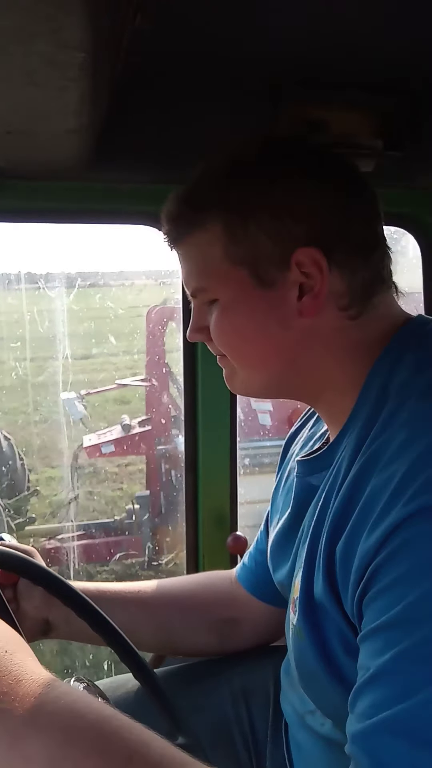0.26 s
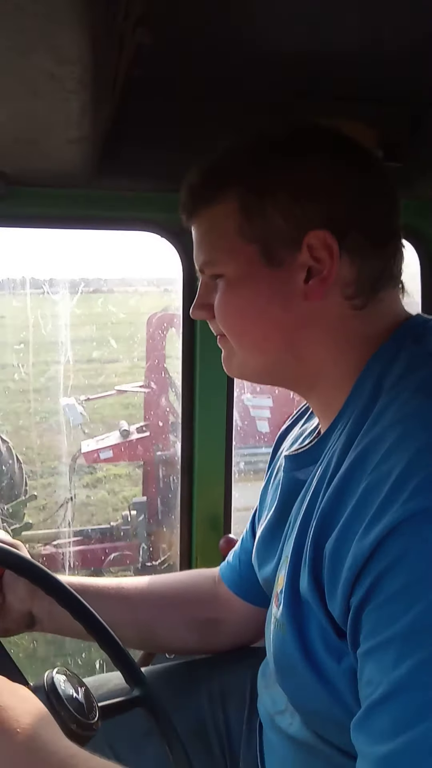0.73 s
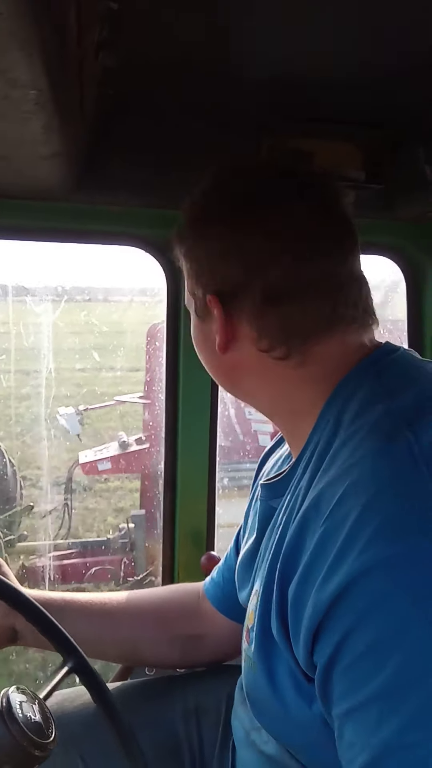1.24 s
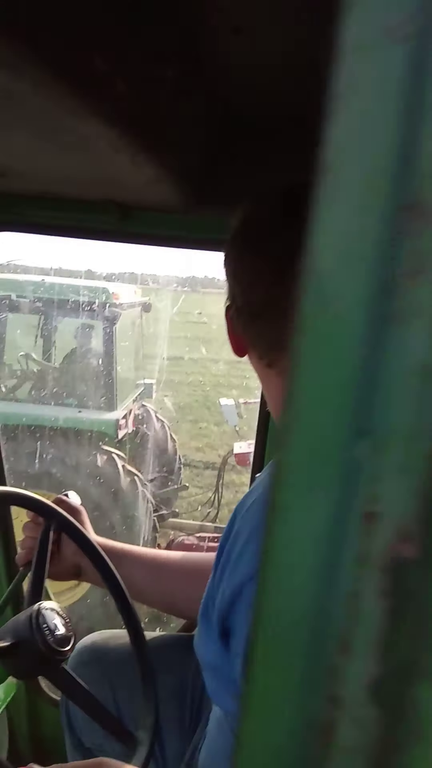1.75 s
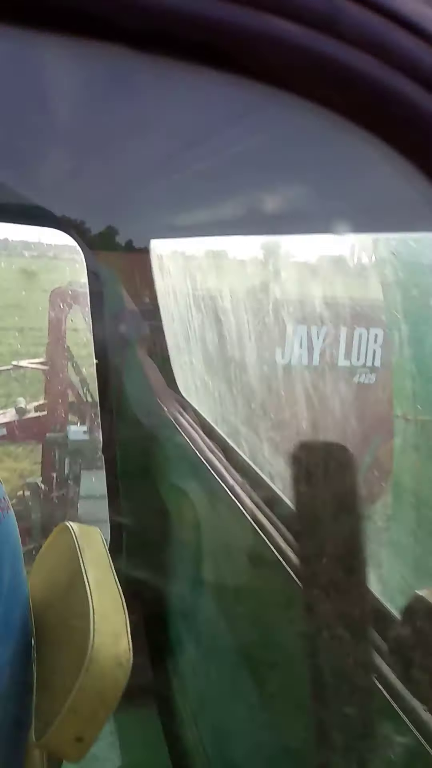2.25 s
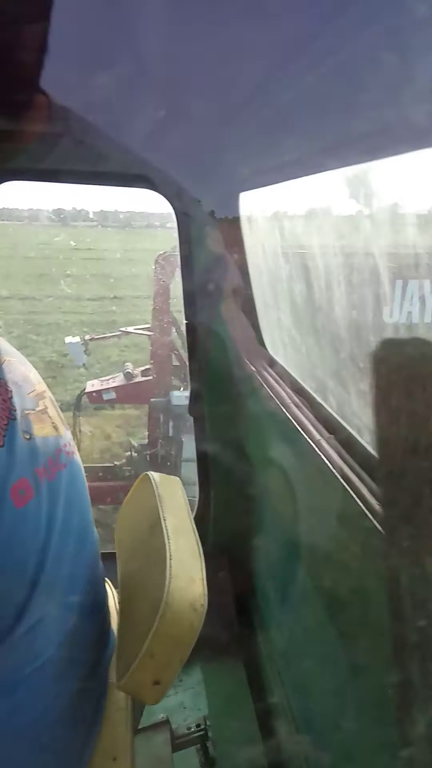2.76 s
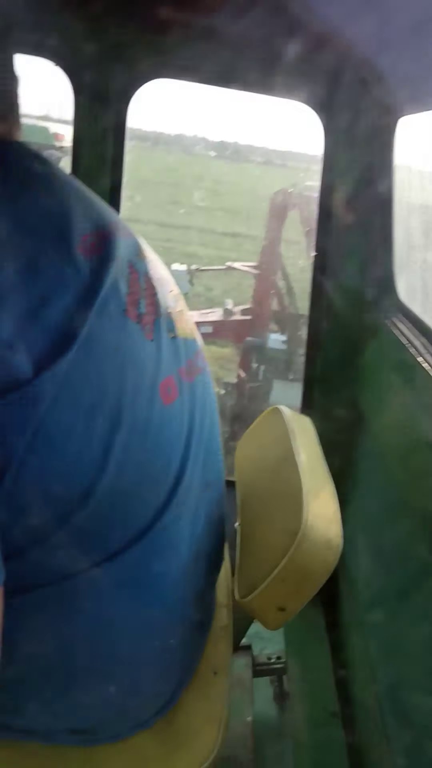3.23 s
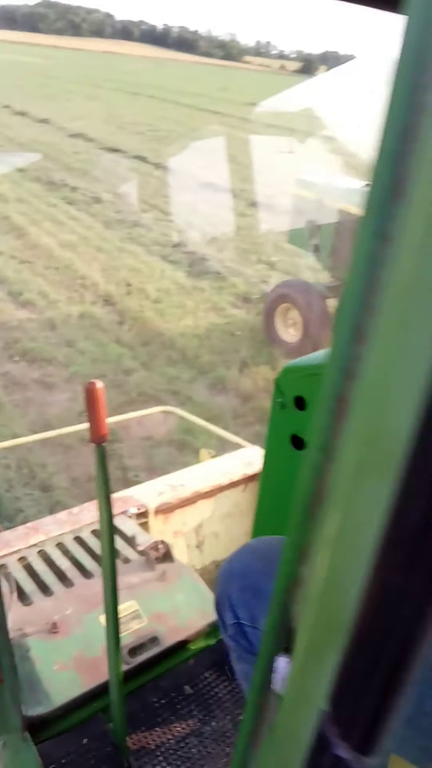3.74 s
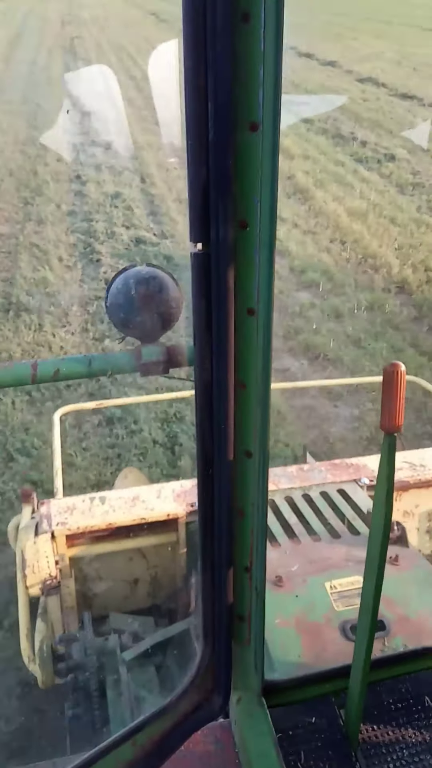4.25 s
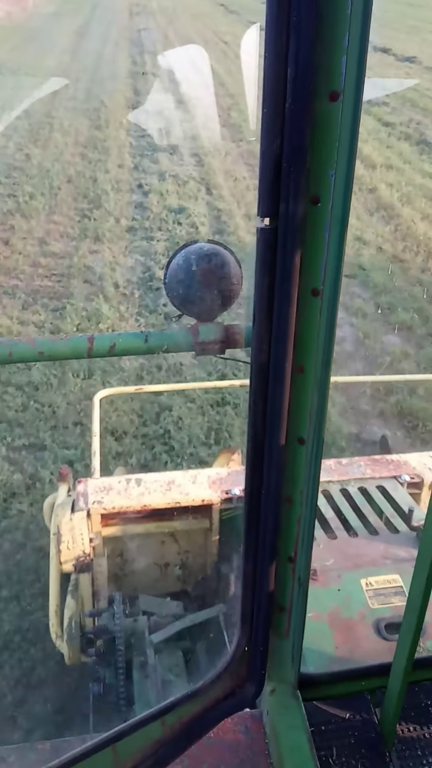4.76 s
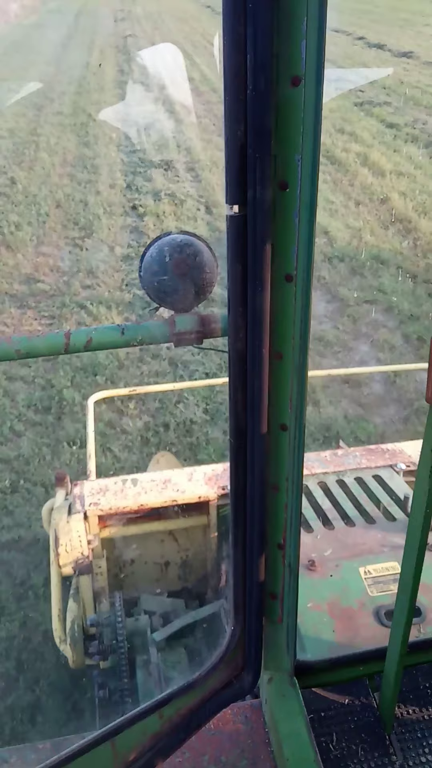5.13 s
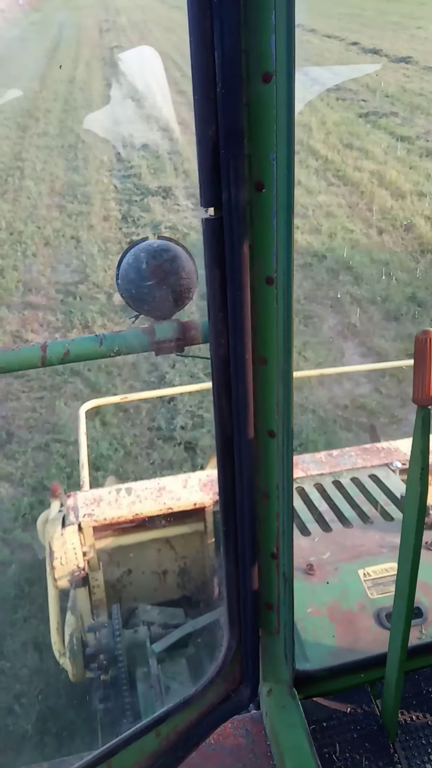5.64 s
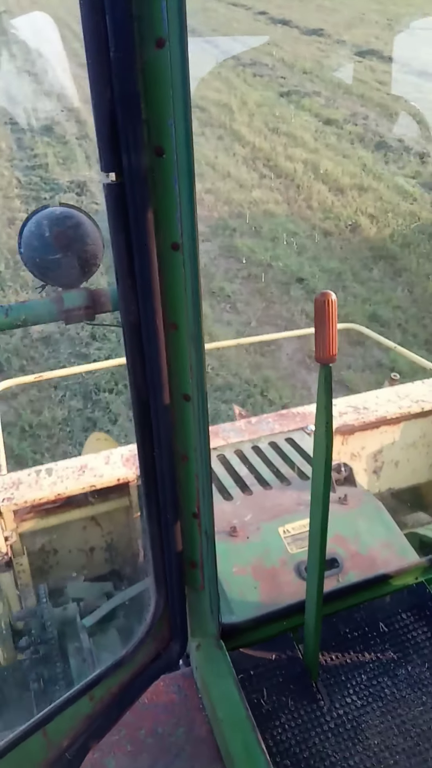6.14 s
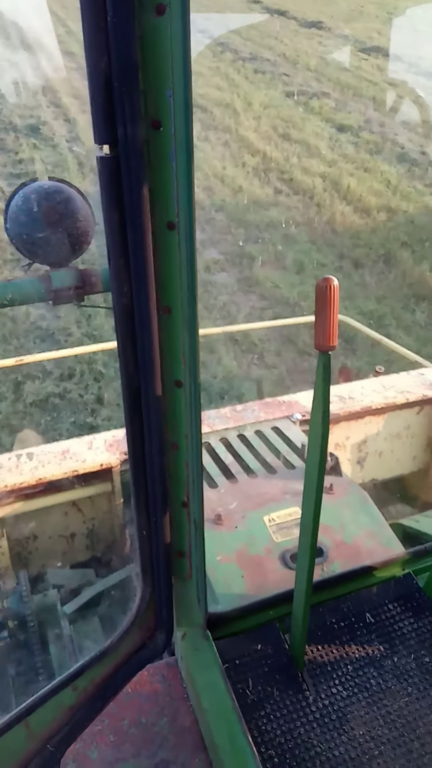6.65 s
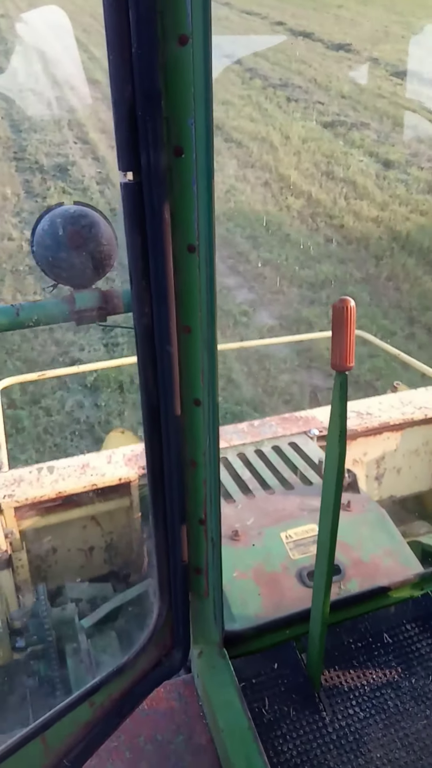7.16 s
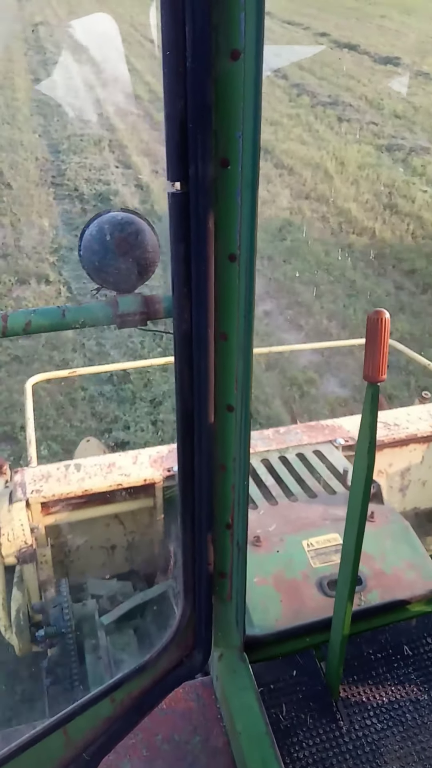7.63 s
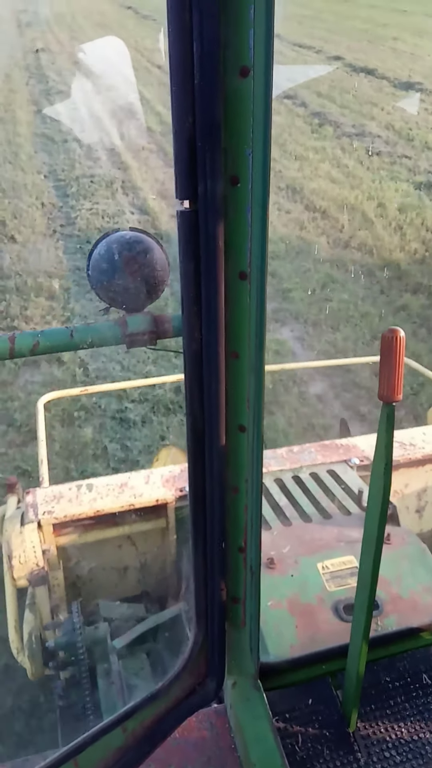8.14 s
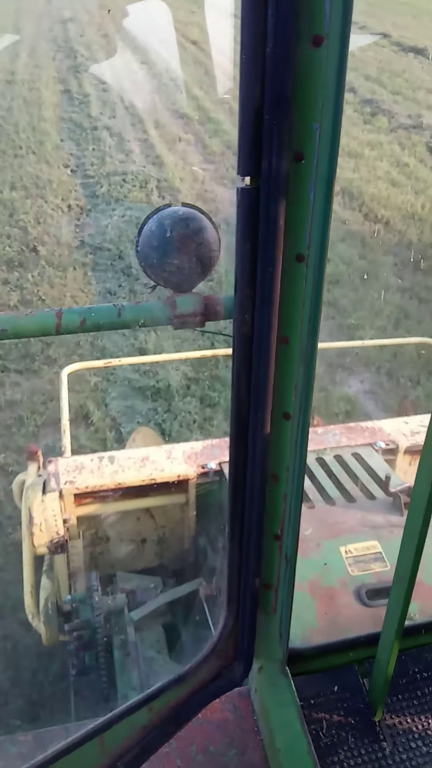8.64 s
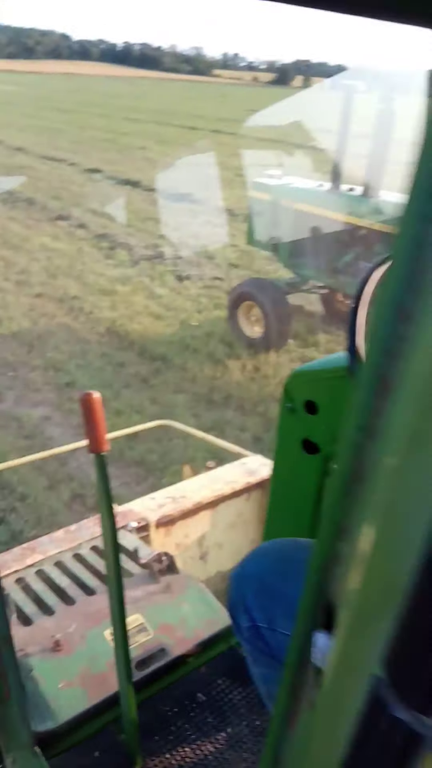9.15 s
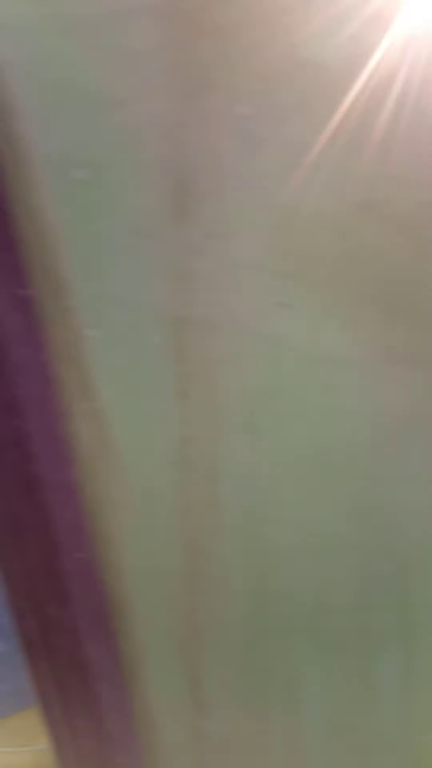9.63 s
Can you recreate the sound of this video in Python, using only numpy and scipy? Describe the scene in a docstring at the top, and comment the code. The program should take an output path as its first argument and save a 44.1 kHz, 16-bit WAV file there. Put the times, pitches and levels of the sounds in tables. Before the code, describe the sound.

A heavy diesel drones steadily from beginning to end inside a harvester cab, beating against blower and shaft hums over a wide, rumbling panel roar. Chains tick within the hiss of blown grass. From 0 to 1.4 seconds the microphone faces the driver; knives buzz under load and squeal strongly around 1 second. Around 1.7 loose parts rattle, and from 2 to 3.5 the bass hum grows fuller, with a lighter cut near 2.5 and a short knock at 3.3. Facing the windscreen from 4, header clatter is more exposed; a scraping, whining burst comes at 4.1 to 4.6, then steadier droning until another at 6.5. Heavier bursts shred and squeal at 7.4, 8.3 and 8.8 to 9.1, each sagging the pitch slightly. After 9.2 the microphone swings back, the deep hum swells, and the noise is cut off at about 9.9.

```python
"""Inside the cab of a self-propelled forage harvester working a row of grass.
A six-cylinder diesel drones in wavering firing lines; blower and shaft hums, geared to it, beat against it.
Wads of grass load the knives, which buzz, shred and squeal, and drag the speed of the whole machine down.
Shaped noise makes the cab's roar, the hiss of blown grass, the header's clatter and the rattle of loose parts.
The bass and the roar's colour change as the microphone moves about and turns from driver to windscreen."""
import sys
import numpy as np
from scipy import signal
from scipy.fft import rfft, irfft
from scipy.io import wavfile
from scipy.ndimage import uniform_filter1d, minimum_filter1d

SR = 44100
rng = np.random.default_rng(int(sys.argv[2]) if len(sys.argv) > 2 else 0)


def digitize_waveform(pressure):
    """Quantize a signal to 16-bit integers and store it at the path in sys.argv[1].

    Rows of a 2-D input are taken as channels; values are limited to [-1, 1].
    """
    field = np.atleast_2d(pressure).T
    bounded = np.clip(field, -1, 1)
    quanta = np.round(bounded * 32767).astype(np.int16)
    wavfile.write(sys.argv[1], SR, quanta)


N = 436149
T = np.arange(N) / SR
HZ = np.fft.rfftfreq(N, 1 / SR)
FREE_HZ = 134.7  # knife strokes a second when running free
SIDES = np.array([[.5], [-.5]])  # left and right port, as halves of a difference


def amp(db):
    """Decibels to gain."""
    return 10 ** (np.asarray(db) / 20)


def unit(x):
    """Scales to an rms of one."""
    return x / np.sqrt(np.mean(x ** 2) + 1e-20)


def follow(rows):
    """The columns of a curve, sample by sample; the first column is the time in seconds."""
    s, *columns = np.transpose(rows)
    return [np.interp(T, s, c) for c in columns]


def read(points, hz):
    """A spectrum's value on a log-frequency axis."""
    f, value = np.transpose(points)
    return np.interp(np.log(hz + 1), np.log(f + 1), value)


def drift(rate_hz):
    """Slow random wandering with an rms of one: noise low-passed at the given rate."""
    grid = np.arange(0, T[-1] + 1, 1 / 400)
    f = np.fft.rfftfreq(len(grid), grid[1])
    spectrum = rfft(rng.standard_normal(len(grid))) / (1 + (f / rate_hz) ** 4)
    return np.interp(T, grid, unit(irfft(spectrum, len(grid))))


def swell(s, length):
    """A bell-shaped passage: it thickens and thins again."""
    return np.exp(-((T - s) / length) ** 2)


def waver(turns, rough, rate_hz):
    """A line whose strength and phase waver."""
    angle = 2 * np.pi * turns
    in_phase = (1 + rough * drift(rate_hz)) * np.cos(angle)
    across = rough * drift(rate_hz) * np.sin(angle)
    return np.sqrt(2 / (1 + 2 * rough ** 2)) * (in_phase + across)


def tone(turns, rough, rate_hz):
    """A wavering line that starts anywhere in its cycle."""
    return waver(turns + rng.random(), rough, rate_hz)


def colour(pair, spectrum):
    """Gives two unrelated signals a spectrum and the cab's left-right likeness."""
    # How alike the two ports sound. Each row: frequency in Hz, left-right likeness (1 is identical).
    likeness = [(25, 0.85), (60, 0.99), (120, 0.92), (190, 0.68), (300, 0.9), (450, 0.73), (750, 0.64),
                (1100, 0.42), (2200, 0.24), (15000, 0.073)]
    a, b = rfft(pair)
    same = np.clip(read(likeness, HZ), -1, 1)
    second = same * a + np.sqrt(1 - same ** 2) * b
    return unit(irfft(np.array([a, second]) * amp(read(spectrum, HZ)), N))


def cab_roar(cycles, roar_db, share, pulsing=0.14, throb=0.12, patchy_db=1.12):
    """Panels shaken by strong and weak firings, swelling in patches; the colour turns with the microphone."""
    # The roar's colour facing the windscreen. Each row: frequency in Hz, relative level in dB.
    roar_colour = [(20, -13.5), (42, -19), (75, -10), (105, -2.5), (145, 4), (200, 2), (300, -0.5),
                   (430, -0.5), (490, -7.5), (800, -3), (1200, -16), (2500, -21), (6000, -28), (15000, -82)]
    # What facing the driver adds to that colour. Each row: frequency in Hz, change in dB.
    driver_colour = [(40, 6), (200, 0.5), (330, 0.5), (440, 2.5), (540, 4.5), (790, -5.5), (1200, 8.5),
                     (2500, 1), (6000, 3.5)]
    firings = 6 * cycles
    pulse = 1 + pulsing * np.cos(2 * np.pi * firings) + throb * np.cos(np.pi * firings)
    shake = rng.standard_normal((2, N)) * pulse
    # patches of the time-frequency plane swell and fade, alike in both ports
    z = signal.stft(shake, nperseg=512)[2]
    patches = uniform_filter1d(rng.standard_normal(z.shape[1:]), size=5, axis=0)
    patches = unit(uniform_filter1d(patches, size=14, axis=1))
    shake = signal.istft(z * amp(patchy_db * patches), nperseg=512)[1][:, :N]
    front = colour(shake, roar_colour)
    beside = irfft(rfft(front) * amp(read(driver_colour, HZ)), N)
    return amp(roar_db) * (share * beside + (1 - share) * front)


def hollowed(roar, width_octaves=0.4):
    """The cab's standing waves lift or hollow three bands of the roar differently at each place."""
    # Each row: time in seconds, peak change of the low, the middle and the high band in dB.
    hollows = [(0, -3, 0, -1.5), (1.2, -7.5, -0.5, -2), (1.75, 1, 0, -0.5), (2.3, 1.5, -4, -0.5),
               (3.3, 2, -2.5, -0.5), (4.1, 0.5, -1.5, -1), (5.3, -2, 0.5, 2), (6.8, 1, -0.5, 0.5),
               (7.7, 0.5, 0.5, 0), (9.1, 0.5, 0.5, -1.5), (9.89, -2, 0, 2.5)]
    spectrum, octave = rfft(roar), np.log2(HZ + 1)
    out = roar.copy()
    for hz, db in zip([283, 430, 900], follow(hollows)):
        bell = np.exp(-((octave - np.log2(hz)) / width_octaves) ** 2)
        out += (amp(db) - 1) * irfft(spectrum * bell, N)
    return out


def chains(clicks_per_s=260, clatter=0.32, level_db=-35, flutter_db=1.5):
    """Chain links tick in the hiss of blown grass: random clicks swell a fluttering noise."""
    # The hiss's colour. Each row: frequency in Hz, relative level in dB.
    hiss_colour = [(900, -23), (2200, 2.5), (3200, -1), (4400, -2), (5500, 2.5), (6600, -1.5), (7600, -11),
                   (8100, -37), (8700, -19.5), (11500, -23), (13800, -32.5), (15000, -22.5)]
    sizes = amp(4 * np.minimum(rng.exponential(1, N), 3))
    clicks = (rng.random(N) < clicks_per_s / SR) * sizes
    rattle = unit(signal.lfilter([1], [1, -np.exp(-1 / (0.0017 * SR))], clicks))  # 1.7 ms decay
    strength = np.sqrt(1 + (clatter * rattle) ** 2) * amp(flutter_db * drift(22))
    return amp(level_db) * colour(strength * rng.standard_normal((2, N)), hiss_colour)


def header(share, level_db=-33, swell_db=-2.0, clicks_per_s=120):
    """Tines and auger of the pickup header knock irregularly, loudest when the microphone faces them."""
    # The clatter's colour through the windscreen. Each row: frequency in Hz, relative level in dB.
    clatter_colour = [(200, -13), (330, -1), (520, 1), (800, -3.5), (1200, 9), (2000, 6.5), (2900, 0.5),
                      (3600, -41), (5500, 1.5), (8000, -62)]
    knocks = (rng.random(N) < clicks_per_s / SR) * rng.uniform(.3, 1, N)
    strength = 0.5 + unit(signal.lfilter([1], [1, -np.exp(-1 / (0.0089 * SR))], knocks))  # 8.9 ms decay
    exposure = 1 - 0.84 * share
    clatter = colour(strength * rng.standard_normal((2, N)), clatter_colour)
    return exposure * amp(level_db + swell_db * drift(11)) * clatter


def fittings():
    """Loose parts of the cab chatter briefly: band-passed noise with a fast attack and a short decay."""
    # Each row: start in seconds, pitch in Hz, level in dB before the envelope, decay in seconds,
    # half bandwidth as a share of the pitch.
    knocks = [(0.445, 490, -20, 0.035, 0.19), (1.635, 536, -21, 0.023, 0.15), (1.69, 1240, -29, 0.06, 0.27),
              (1.75, 5400, -31, 0.04, 0.12), (2.067, 1840, -24, 0.015, 0.08),
              (2.64, 1520, -23.5, 0.023, 0.04), (2.783, 5500, -23, 0.0072, 0.073),
              (3.3, 940, -16, 0.014, 0.044), (4.06, 435, -14, 0.045, 0.25), (8.325, 1040, -22, 0.03, 0.08),
              (9.275, 1724, -30, 0.055, 0.06)]
    out, t = np.zeros((2, N)), T[:SR // 5]
    for s, hz, db, decay, width in knocks:
        band = signal.butter(2, [hz * (1 - width), hz * (1 + width)], "band", fs=SR, output="sos")
        chatter = unit(signal.sosfilt(band, rng.standard_normal((2, len(t)))))
        envelope = np.exp(-t / decay) * (1 - np.exp(-t / 0.0012))
        out[:, round(s * SR):][:, :len(t)] += amp(db) * chatter * envelope
    return out


def engine_block(cycles, level_db=-44, fall_db_per_octave=-2, uneven_db=4, change_hz=2.2):
    """The block rings on high multiples of half the firing rate; lines come and go among standing waves."""
    half_firings = 3 * cycles
    out = np.zeros(N)
    for k in range(11, 23):
        line_db = level_db + fall_db_per_octave * np.log2(k / 11) + uneven_db * np.tanh(drift(change_hz))
        out += amp(line_db) * np.sqrt(2) * np.cos(2 * np.pi * (k * half_firings + rng.random()))
    return out


def shafts(strokes, throb_db, level_db=-1.5):
    """Belt-driven shaft hums beat with the engine; their long waves change less from place to place."""
    # Turns of each shaft per knife stroke.
    shaft_ratios = [.4812, .6024, .9624, 1.181, 1.4436, 2.441]
    # Hum of each shaft, relative level in dB.
    shaft_db = [-15, -15.5, -8, -16, -9.5, -16.5]
    hums = sum(amp(db) * tone(ratio * strokes, rough=0.07, rate_hz=6.1)
               for ratio, db in zip(shaft_ratios, shaft_db))
    # only half of the throb's change from place to place
    return amp(level_db + (throb_db + throb_db.mean()) / 2) * hums


def blower(cycles, blower_db, overtone_db, share, upper_db=-39, node_turns=-0.1,
           beat_hz=2.385, beat_at_s=2.26):
    """Paddles pass just above the engine's second firing harmonic, so the drone beats slowly."""
    # the two tones are in step, and swell together, around beat_at_s
    passes = 12 * cycles + beat_hz * (T - beat_at_s)
    # upper lines show beside the driver
    upper = sum(tone(k * passes, rough=.3, rate_hz=4) for k in (3, 4))
    # by the windscreen a node of the blower tone puts the two ports out of step
    hum = waver(passes + node_turns * (1 - share) * SIDES, rough=0.091, rate_hz=2.8)
    overtone = tone(2 * passes, rough=0.32, rate_hz=5.5)
    return amp(blower_db) * hum + amp(overtone_db) * overtone + amp(upper_db) * share * upper


def diesel(cycles, firing_db, throb_db, share, second_db=-8.0, uneven_db=-6.5):
    """Six firings a cycle and their second harmonic; unequal cylinders fill in the other multiples."""
    # Lines beside the firing tone. Each row: multiple of the four-stroke cycle, relative level in dB,
    # change when facing the driver in dB.
    cycle_lines = [(1, -35, 0), (2, -21, -2.5), (3, -26.5, 7), (5, -11, -10.5), (7, -12, 6),
                   (8, -4.5, -5.5), (9, -2, 1), (10, 0.5, 1), (14, -25, -1), (15, -9, -1), (17, -16.5, 5.5),
                   (20, -13.5, -13), (26, -10.5, -2), (34, -13, -9)]
    firings = 6 * cycles
    firing = tone(firings, rough=0.081, rate_hz=6.7)
    firing = firing + amp(second_db) * waver(2 * firings, rough=0.035, rate_hz=2.6)
    uneven = sum(amp(db + driver_db * share) * tone(k * cycles, rough=0.033, rate_hz=2.4)
                 for k, db, driver_db in cycle_lines)
    return amp(firing_db) * firing + amp(throb_db + uneven_db) * uneven


def feed(patchy_db=2, thin_crop_db=-37, flywheel_s=0.219):
    """Wads ride on the thin crop and drag the flywheel down: the cutting load, and the sag in Hz."""
    # Wads reaching the knives. Each row: middle in seconds, half length in seconds, cutting load in dB,
    # drag on the knife strokes in Hz before the flywheel's lag.
    wads = [(0.04, 0.061, -25, 1.36), (0.539, 0.37, -32.5, 0.4), (1.001, 0.21, -26.5, 2.32),
            (1.248, 0.14, -25, 0.4), (2.098, 0.22, -33, 1.2), (2.503, 0.15, -27.5, 0.33),
            (3.119, 0.35, -42, 0.71), (4.175, 0.17, -26, 1.5), (4.385, 0.13, -26, 2.12),
            (6.455, 0.21, -28.5, 1.05), (6.556, 0.025, -28, 0.29), (7.425, 0.18, -25, 3),
            (7.94, 0.13, -36, 0.43), (8.287, 0.097, -25, 1.22), (8.351, 0.38, -28.5, 1.66),
            (8.823, 0.13, -24, 2.28), (9.027, 0.099, -28.5, 1.36)]
    power = amp(thin_crop_db + patchy_db * drift(1.66)) ** 2
    power = power + sum((amp(db) * swell(s, length)) ** 2 for s, length, db, _ in wads)
    drag_hz = sum(hz * swell(s, length) for s, length, _, hz in wads)
    keep = np.exp(-1 / (flywheel_s * SR))
    sag_hz = signal.lfilter([1 - keep], [1, -keep], drag_hz, zi=[drag_hz[0]])[0]
    return np.sqrt(power), sag_hz


def judder(strokes, load, depth_hz=0.298, rate_hz=9):
    """Uneven crop jerks the cutterhead against its belt, the more the heavier the load."""
    return strokes + np.cumsum(depth_hz * load / load.max() * drift(rate_hz)) / SR


def housing(strokes, load, hum_db=-2.0, steepness=0.27, spread=0.48, flicker_db=3.5, wander=0.2):
    """The steel housing hums on the 4th knife harmonic under load, and whines at times on the 10th."""
    # Whines around the wads. Each row: middle in seconds, half length in seconds, level in dB before flicker.
    whine_swells = [(0.05, 0.15, -35.5), (1.0, 0.21, -37.5), (1.26, 0.19, -34), (2.45, 1, -39),
                    (4.31, 0.17, -34), (4.554, 0.097, -26.5), (6.475, 0.33, -34), (7.54, 0.16, -30),
                    (8.01, 0.14, -31), (8.32, 0.12, -29), (8.7, 0.39, -34), (9.053, 0.1, -30.5)]
    ringing = np.sqrt(sum((amp(db) * swell(s, length)) ** 2 for s, length, db in whine_swells))
    # a standing wave puts the two ports out of step
    angle = 2 * np.pi * (10 * strokes + spread * SIDES) + wander * drift(8)
    whine = np.sqrt(2) * ringing * amp(flicker_db * np.tanh(drift(21))) * np.cos(angle)
    hum = tone(4 * strokes, rough=.2, rate_hz=5)
    return whine + amp(hum_db) * load * (load / load.max()) ** steepness * hum


def squeals(strokes, level_db=-1, flicker_db=1.5, flicker_hz=36, pulsing=0.25, scrape_hz=260,
            rough_per_multiple=0.0033, settle_s=0.01):
    """Single knife harmonics squeal, pulsing with the strokes; high and short ones smear into a scrape."""
    # Squeals of hard wads. Each row: middle in seconds, half length in seconds, multiple of the knife
    # stroke, level in dB before the common trim and flicker.
    squeal_bursts = [(0.77, 0.15, 11, -30), (0.92, 0.08, 28, -34), (0.92, 0.11, 39, -39),
                     (0.998, 0.14, 40, -36), (1.04, 0.16, 29, -33), (1.04, 0.12, 41, -32),
                     (1.05, 0.2, 36, -36), (1.093, 0.09, 4, -17.5), (1.19, 0.28, 14, -30.5),
                     (1.217, 0.27, 11, -24), (1.22, 0.15, 23, -36), (1.17, 0.2, 33, -39.5),
                     (2.14, 0.2, 17, -34), (2.48, 0.13, 20, -31), (2.563, 0.12, 21, -39),
                     (2.56, 0.09, 31, -41), (4.12, 0.11, 31, -38), (4.208, 0.17, 23, -39),
                     (4.203, 0.13, 22, -39), (4.17, 0.21, 16, -34), (4.169, 0.088, 39, -40),
                     (4.21, 0.11, 14, -32), (4.27, 0.2, 40, -33), (4.39, 0.2, 29, -35),
                     (4.4, 0.13, 38, -31.5), (4.447, 0.25, 20, -33), (6.413, 0.1, 14, -33),
                     (6.438, 0.1, 31, -35), (6.44, 0.085, 41, -31), (6.47, 0.13, 39, -35.5),
                     (6.478, 0.16, 17, -35.5), (6.561, 0.06, 31, -35), (7.3, 0.15, 17, -28),
                     (7.341, 0.25, 39, -30), (7.392, 0.14, 14, -40), (7.397, 0.036, 16, -30),
                     (7.4, 0.045, 17, -29), (7.49, 0.12, 31, -33), (7.5, 0.13, 30, -38),
                     (7.48, 0.11, 38, -39), (8.196, 0.13, 41, -30.5), (8.231, 0.13, 14, -37),
                     (8.281, 0.098, 18, -27), (8.293, 0.097, 15, -34.5), (8.28, 0.16, 42, -38),
                     (8.35, 0.18, 31, -37), (8.798, 0.12, 18, -28), (8.819, 0.16, 15, -31),
                     (8.81, 0.13, 40, -39), (8.821, 0.14, 41, -35), (8.848, 0.12, 39, -32),
                     (8.864, 0.14, 22, -33), (8.87, 0.12, 31, -38), (8.89, 0.13, 29, -39),
                     (9.006, 0.125, 14, -37), (9.049, 0.089, 31, -40), (9.05, 0.12, 23, -32.5)]
    out, flicker = np.zeros((2, N)), unit(amp(flicker_db * np.tanh(drift(flicker_hz))))
    for s, length, k, db in squeal_bursts:
        near = abs(T - s) < length
        rough = np.clip(rough_per_multiple * k + settle_s / length, .05, .9)
        strength = np.cos(np.pi / 2 * (T[near] - s) / length) ** 2
        strength *= np.roll(flicker, rng.integers(N))[near]
        strength *= 1 + pulsing * np.cos(2 * np.pi * (strokes[near] + rng.random()))
        # a steady ring plus slow complex noise, which broadens the line
        smear = signal.lfilter(*signal.butter(2, rough * scrape_hz, fs=SR), rng.standard_normal((2, 2, SR)))
        a, b = smear[..., :near.sum()]
        steady = np.sqrt(1 - rough) * np.exp(2j * np.pi * rng.random((2, 1)))
        ring = steady + np.sqrt(rough / 2) * (unit(a) + 1j * unit(b))
        line = (ring * np.exp(2j * np.pi * k * strokes[near])).real
        out[:, near] += np.sqrt(2) * amp(db + level_db) * strength * line
    return out


def cutterhead(strokes, load, buzz_db=-4.0, shred_db=-5, sing_db=-7, burst=0.7, change_hz=9,
               uneven_db=4.5, lumps_db=1.17):
    """Knives chop grass against the shear bar: a shifting buzz, and a burst of shredding per stroke."""
    # Colour of buzz and shredding. Each row: frequency in Hz, relative level in dB.
    knife_colour = [(300, -29), (530, -7.5), (700, -11.5), (1100, -1.5), (2200, 5), (3400, 3), (4600, 0.5),
                    (5300, 0), (6500, -2), (7500, -10.5), (8100, -17), (9000, -16), (13500, -40),
                    (15000, -29)]
    # Harmonics that ring faintly under any load. Each row: multiple of the knife stroke, relative level in dB.
    ringing_lines = [(5, -5), (6, -1), (7, -0.5), (8, -8), (11, -6.5), (14, -7), (15, -4), (17, -12),
                     (22, -9.5), (31, -17)]
    turn = np.exp(2j * np.pi * strokes).astype(np.complex64)
    partial, buzz = turn.copy(), np.zeros((2, N))
    for k in np.arange(2, 52):
        partial *= turn  # now the k-th harmonic
        strength = amp(read(knife_colour, k * FREE_HZ) + uneven_db * np.tanh(drift(change_hz)))
        for side in buzz:
            side += strength * (drift(change_hz) * partial.real + drift(change_hz) * partial.imag)
    bursts = 1.4 + np.exp(-(strokes % 1) / burst)
    shred = colour(bursts * rng.standard_normal((2, N)), knife_colour)
    sing = np.array([sum(amp(db) * tone(k * strokes, rough=0.24, rate_hz=16.0) for k, db in ringing_lines)
                     for side in buzz])
    mix = amp(buzz_db) * unit(buzz) + amp(shred_db) * shred + amp(sing_db) * sing
    return load * amp(lumps_db * drift(27)) * mix


def scene(cycle_ratio=.12345, cab_lead_s=0.0001):
    """The crop loads one shaft, and its speed plays the whole machine."""
    # Standing waves at the places the microphone passes. Each row: time in seconds, then firing tone,
    # blower tone, blower overtone and engine throb, each a level in dB before its source's own balance.
    standing = [(0, -26.5, -14.5, -27, -19.5), (0.25, -26, -15.5, -26, -14.5),
                (1.5, -26.5, -18, -26.5, -18), (1.9, -21, -24.5, -29, -17.5),
                (2.25, -15.5, -15.5, -43, -26.5), (3.1, -16.5, -15.5, -47, -26.5),
                (3.5, -15, -13.5, -35, -16.5), (4.05, -19, -24.5, -26, -21.5),
                (4.6, -19.5, -25.5, -39, -19), (5.3, -19, -20.5, -28, -18.5), (7.0, -20.5, -23, -26.5, -20),
                (7.6, -21, -26, -31.5, -19), (8.9, -20.5, -31, -38, -20), (9.35, -16.5, -12, -42, -21),
                (9.89, -14.5, -17.5, -30, -22)]
    # The microphone turns between driver and windscreen. Each row: time in seconds, share heard facing
    # the driver (0-1), roar level in dB before hollowing, left minus right in dB, chains and header gain in dB.
    facing = [(0, 0.97, -20.5, 2, 1), (1, 1, -20, 1, 4.5), (1.7, 0.96, -18, 1.5, 3),
              (2.2, 0.5, -18, 1.5, -1.5), (3.5, 0.67, -18.5, 1, 1), (4, 0.13, -17, 3, 1),
              (7, 0.22, -18, 3.5, 0.5), (9.1, 0.02, -16.5, 3.5, 2), (9.4, 0.72, -19.5, 1.5, -2),
              (9.89, 0.65, -18.5, 0, 3)]
    load, sag_hz = feed()
    strokes = np.cumsum(FREE_HZ - sag_hz) / SR
    cycles = cycle_ratio * strokes  # four-stroke engine cycles
    knives = judder(strokes, load)
    firing_db, blower_db, overtone_db, throb_db = follow(standing)
    share, roar_db, lean_db, hiss_db = follow(facing)
    drone = diesel(cycles, firing_db, throb_db, share) + blower(cycles, blower_db, overtone_db, share)
    drone = drone + shafts(strokes, throb_db) + engine_block(cycles)
    body = (drone + hollowed(cab_roar(cycles, roar_db, share))) * amp(SIDES * lean_db)
    # facing the windscreen, drone and roar reach the left port sooner
    body = np.array([np.interp(T + side * cab_lead_s * (1 - share), T, port)
                     for side, port in zip(SIDES, body)])
    cutting = cutterhead(knives, load) + housing(knives, load) + squeals(knives)
    return body + cutting + amp(hiss_db) * (chains() + header(share)) + fittings()


def record(dry, lag_s=0.000298, bass_lag_s=0.00012, bass_hz=800, edge_hz=15550):
    """Two ports of unlike colour, the left reached first, less so in the bass; peak limiter, then low-pass."""
    # The ports' unlike colour. Each row: frequency in Hz, left minus right in dB.
    tilt = [(100, -1), (300, -1), (600, -1.5), (1200, 1), (2200, 2.5), (3600, -0.5), (4400, -3.5),
            (5100, -9.5), (5800, -6.5), (6800, 0.5), (9000, 0.5), (15000, -3.5)]
    lag = lag_s + (bass_lag_s - lag_s) / (1 + (HZ / bass_hz) ** 2)
    response = amp(SIDES * read(tilt, HZ)) * np.exp(2j * np.pi * HZ * lag * SIDES)
    ports = irfft(rfft(dry * signal.windows.tukey(N, .001)) * response, N)
    # the limiter's gain dips before each peak and recovers after it
    room = np.minimum(1, .82 / (abs(ports).max(0) + 1e-9))
    gain = minimum_filter1d(room, size=601)
    gain = uniform_filter1d(uniform_filter1d(gain, size=301), size=301)
    low_pass = signal.firwin(511, edge_hz, window=("kaiser", 9), fs=SR)
    return signal.oaconvolve(ports * gain, low_pass[None], "same")


dry = scene()
out = record(dry)
digitize_waveform(out)
```